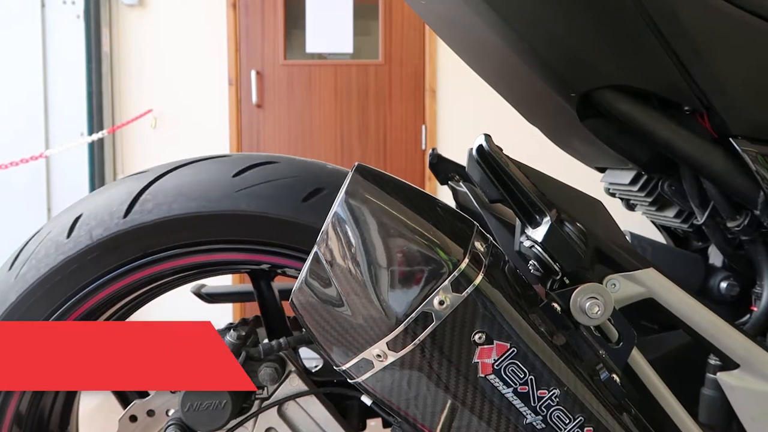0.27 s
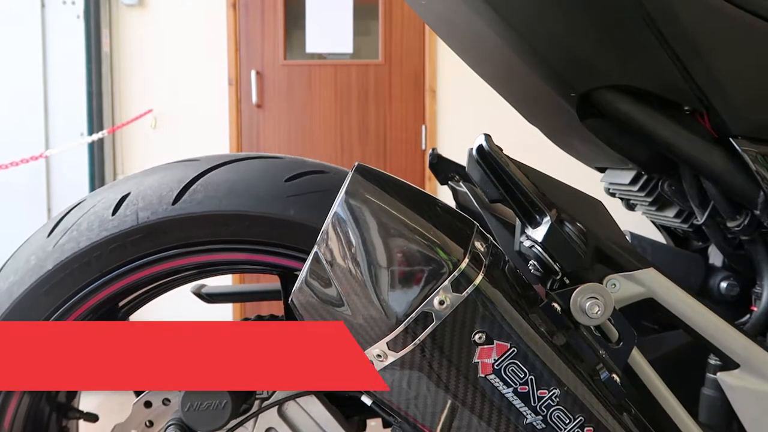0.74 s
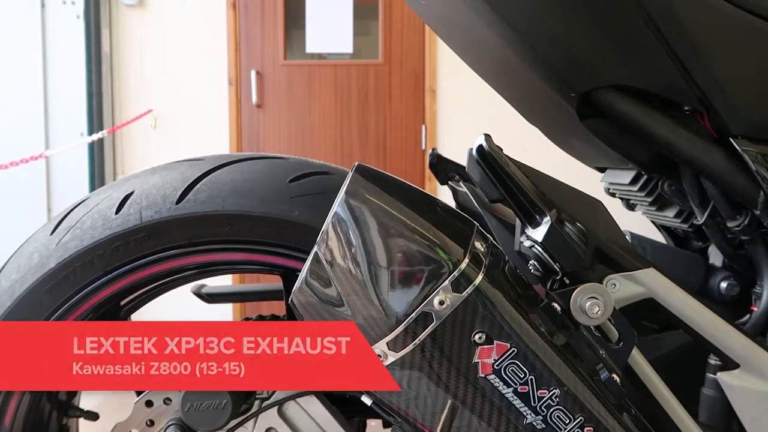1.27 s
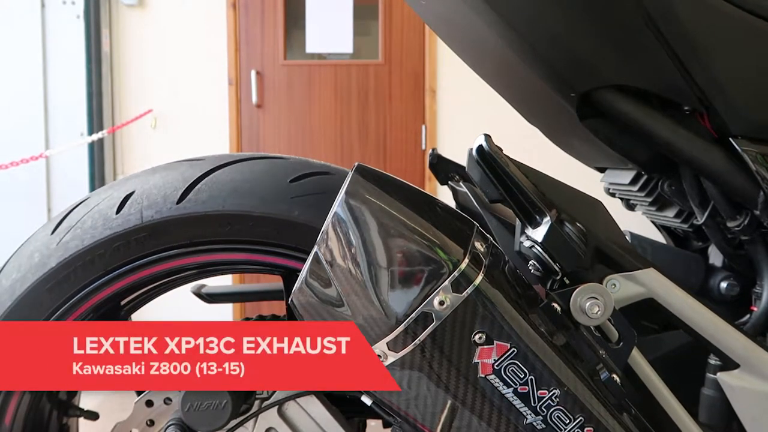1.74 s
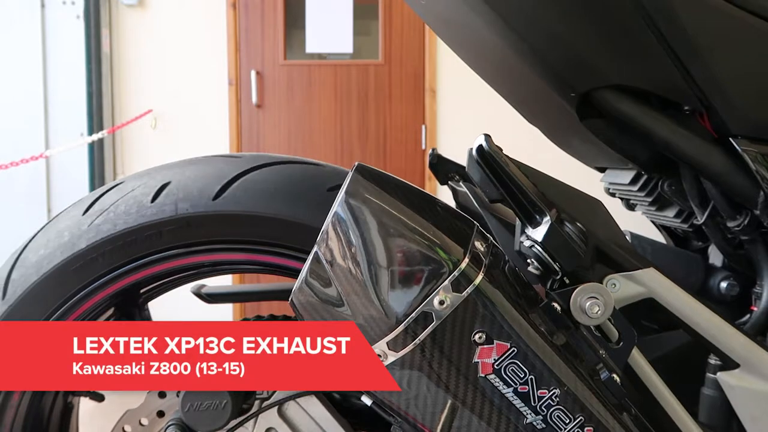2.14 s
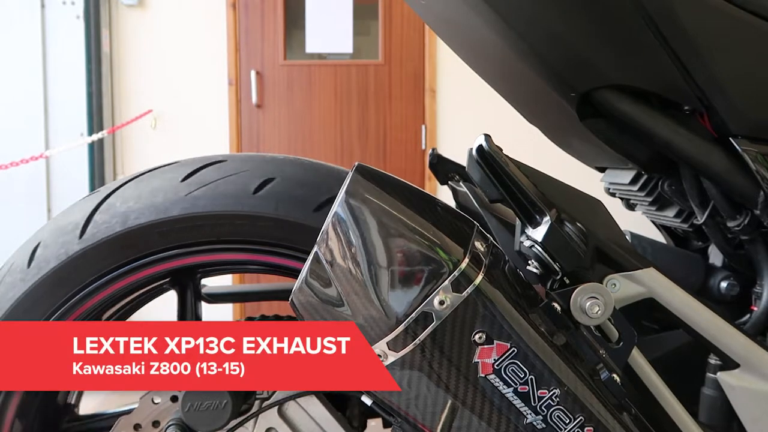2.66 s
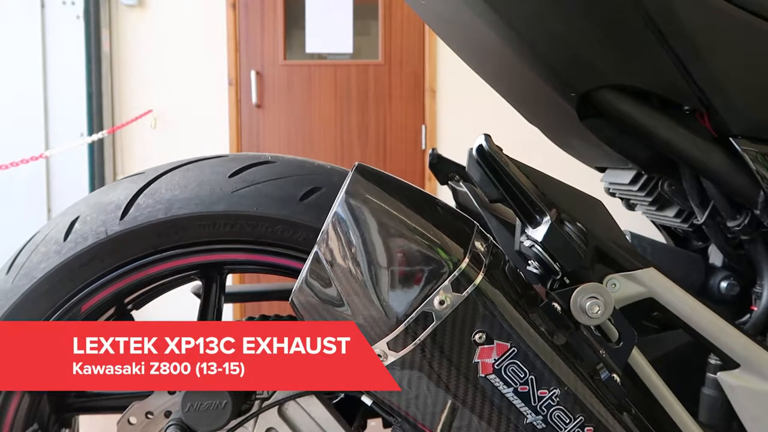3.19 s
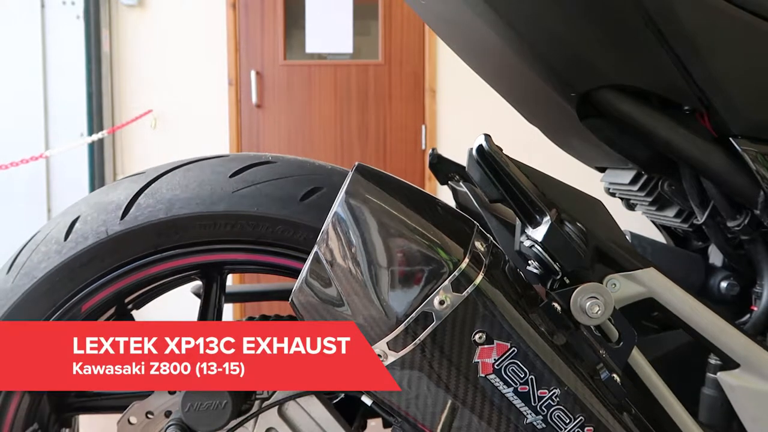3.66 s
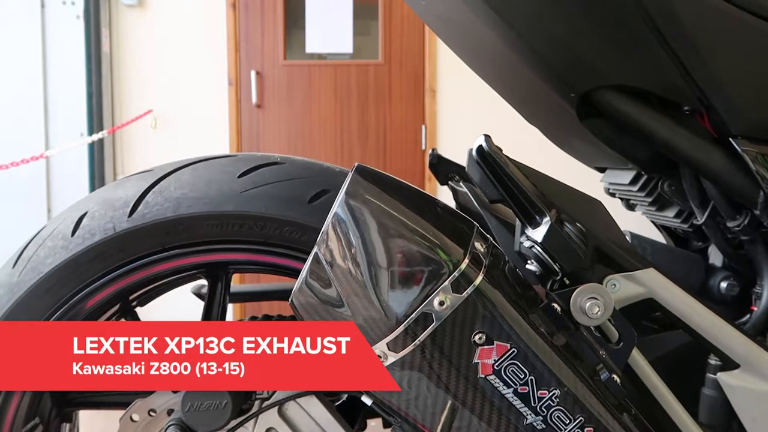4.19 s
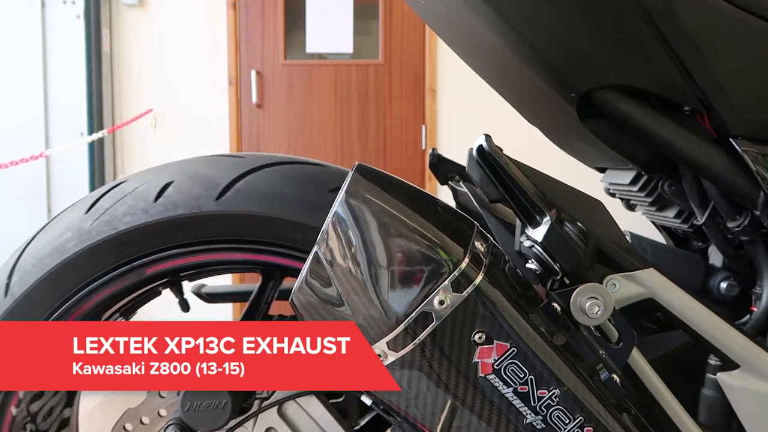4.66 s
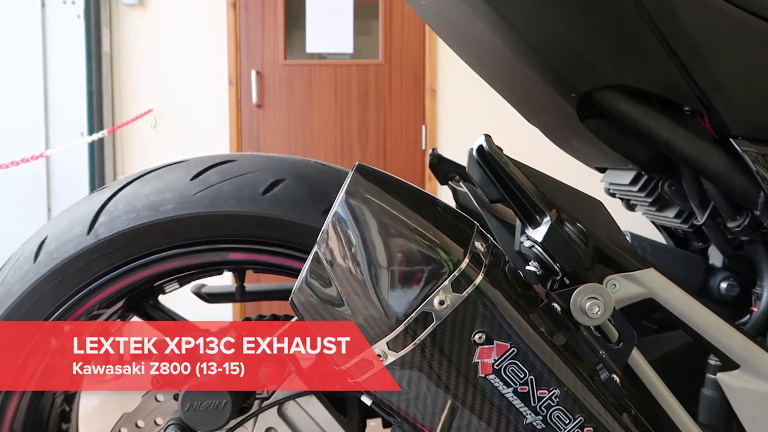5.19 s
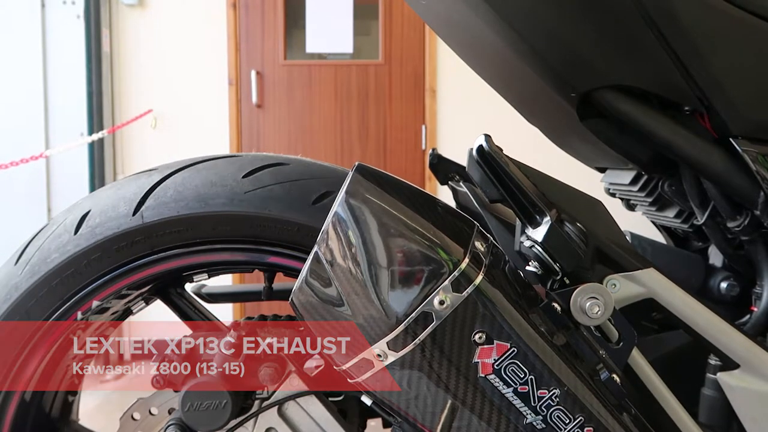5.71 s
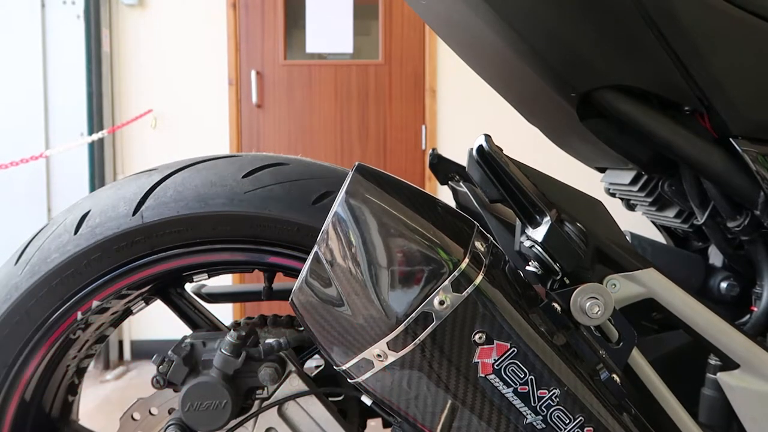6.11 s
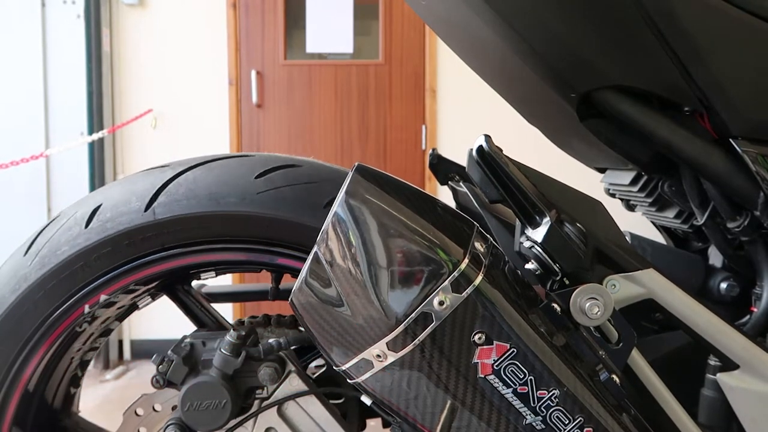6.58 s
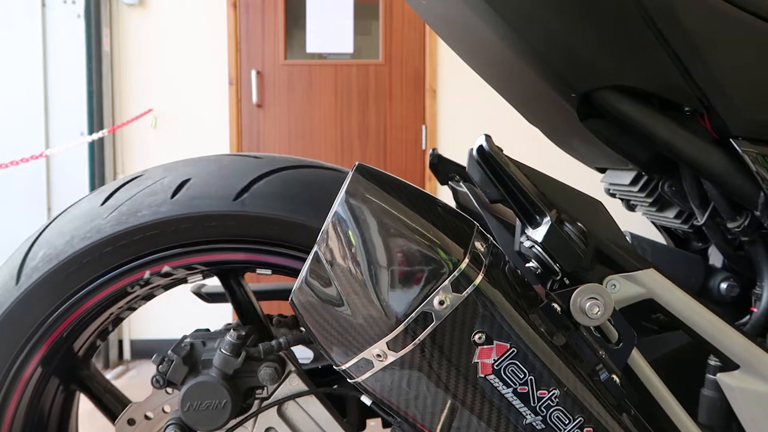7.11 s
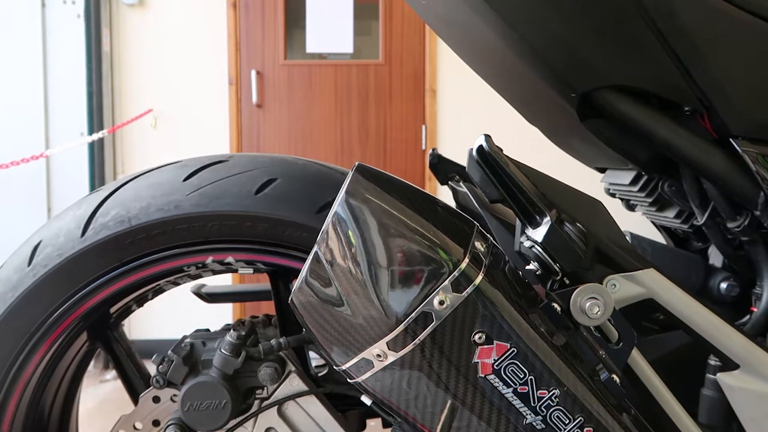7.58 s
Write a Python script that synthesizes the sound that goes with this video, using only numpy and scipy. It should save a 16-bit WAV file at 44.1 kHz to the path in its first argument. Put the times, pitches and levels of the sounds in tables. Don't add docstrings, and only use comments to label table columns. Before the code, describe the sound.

A motorcycle engine is revved indoors, miked near its silencer in stereo. It begins on a falling hum and soft, uneven idle puffs. Three short throttle stabs follow, the last strongest: crackling firing pulses, a fast rising snarl with hissing gas, a low gulp as the throttle shuts, then a clean descending drone with bright mechanical whirr and lumpy idle. Hard walls add a short ring.

```python
import sys
import numpy as np
from scipy import signal
from scipy.fft import rfft, irfft
from scipy.io import wavfile

SR = 44100
rng = np.random.default_rng(int(sys.argv[2]) if len(sys.argv) > 2 else 0)


def bounce(signal):
    frames = np.transpose(np.atleast_2d(signal))
    limited = np.clip(frames, -1, 1)
    pcm = np.round(limited * 32767).astype(np.int16)
    wavfile.write(sys.argv[1], SR, pcm)


def natural_amplitude(level_db):
    exponent = np.asarray(level_db, float) / 20
    return 10 ** exponent


N = 346185

# (throttle opens [s], top speed [s], fuel returns [s], coast length [share], level [dB])
BLIPS = [
    (-0.9, -0.55, 0.51, 1.01, -14),
    (1.69, 2.03, 2.91, 0.97, -1),
    (3.925, 4.31, 5.395, 1.01, 0.1),
    (6.295, 6.67, 7.71, 0.99, 1.1),
]
# (time [s], peak level [dB])
BARKS = [(0.59, -35), (0.646, -32), (0.706, -30), (0.827, -30), (0.872, -35), (0.94, -30), (1.099, -32),
         (1.144, -34), (1.204, -32), (1.298, -32), (1.343, -30), (1.386, -29), (1.456, -32), (1.526, -28),
         (1.571, -26), (1.643, -30), (1.69, -26), (3.038, -17), (3.092, -16), (3.134, -20), (3.195, -18),
         (3.257, -21), (3.332, -24), (3.385, -16), (3.423, -17), (3.528, -20), (3.573, -18), (3.629, -18),
         (3.717, -19), (3.761, -14), (3.801, -16), (3.889, -15), (3.932, -14), (3.691, -27), (5.481, -14),
         (5.525, -25), (5.559, -25), (5.644, -23), (5.731, -24), (5.962, -29), (6.175, -27), (6.199, -28),
         (5.54, -16), (5.576, -13), (5.611, -15), (5.691, -18), (5.766, -17), (5.836, -22), (5.869, -19),
         (5.906, -14), (5.946, -22), (6.028, -17), (6.069, -17), (6.109, -18), (6.222, -18), (6.268, -14),
         (6.29, -15)]
# (frequency [Hz], width [Hz], gain [dB])
CAN = [(1350, 100, 5), (1580, 130, 6), (1825, 60, 4), (2300, 200, 2), (2930, 260, 10), (4100, 400, 4)]


def rms_one(x):
    return x / np.sqrt(np.mean(x ** 2) + 1e-20)


def cut(x, kind, hz, order=2):
    return signal.sosfilt(signal.butter(order, hz, kind, fs=SR, output="sos"), x)


def resonate(x, peaks):
    hz, width, db = np.transpose(peaks)
    a = natural_amplitude(db / 2)
    half = np.pi * width / SR
    c = -2 * np.cos(2 * np.pi * hz / SR)
    sos = np.transpose([1 + half * a, c, 1 - half * a, 1 + half / a, c, 1 - half / a])
    return signal.sosfilt(np.ascontiguousarray(sos / sos[:, 3:4]), x)


def shape(x, spectrum):
    hz, db = np.transpose(spectrum)
    grid = np.log(np.arange(1, N // 2 + 2) * SR / N)
    return rfft(x) * natural_amplitude(np.interp(grid, np.log(hz), db))


def coloured(spectrum):
    return rms_one(irfft(shape(rng.standard_normal(N), spectrum), N))


def drift(hz, count):
    steps = np.arange(0, N + SR / hz, SR / hz / 2)
    return [np.interp(np.arange(N), steps, row) for row in 1.4 * rng.standard_normal((count, len(steps)))]


def along(rows, x):
    first, *columns = np.transpose(rows)
    return [np.interp(x, first, c) for c in columns]


def ramp(t, length_s):
    return np.clip(t / max(length_s, .005), 0, 1)


def throttle():
    climbing = [(0, 0), (.08, .04), (.235, .175), (.36, .29), (.53, .51), (.66, .68), (.77, .82),
                (.88, .925), (1, 1)]
    # (time from the fuel's return [s], firing rate [Hz])
    coasting = [(-1.1, 368), (-.75, 274), (-.545, 218), (-.255, 151), (0, 104), (.25, 75), (.51, 53),
                (.8, 44.5), (1.5, 43)]
    opening_s, shutting_s, relight_s = .03, .08, .07
    relight_fade_s, level_s = .25, .09
    choke_hz, choke_span_hz = 268, 75
    t = np.arange(N) / SR
    state = np.zeros((7, N))
    for opens, top, back, share, level_db in BLIPS:
        climb = (t - opens) / (top - opens)
        gained, = along(climbing, climb)
        coast, = along(coasting, (t - back) / share)
        peak, = along(coasting, (top - back) / share)
        rate = np.where(t < top, state[0] + gained * (peak - state[0]), coast)
        shut = ramp(t - top, shutting_s)
        cut_off = shut - ramp(t - back, relight_s)
        opened = ramp(t - opens, opening_s) - shut
        choke = ramp(rate - choke_hz, choke_span_hz)
        relight = (t > back) * np.exp(-np.maximum(t - back, 0) / relight_fade_s)
        level = state[6] + ramp(t - opens, level_s) * (level_db - state[6])
        state = np.where(t < opens, state, [rate, climb, opened, cut_off, choke, relight, level])
    return state


def idle_strength(relight, level_db):
    idle_db, relight_db, lump_db, lump_hz = -36, 11, 2.2, 9
    surge_loss_db, surge_fall_db_per_s = 8, 170
    t = np.arange(0, N, 64) / SR
    surges = [db - surge_loss_db - surge_fall_db_per_s * np.abs(t - s) for s, db in BARKS]
    surges = np.interp(np.arange(N) / SR, t, np.max(surges, axis=0))
    wandering = lump_db * drift(lump_hz, count=1)[0]
    return np.maximum(idle_db + level_db + relight_db * relight + wandering, surges)


def controls():
    # (climb time [share], firing level [dB], gas hiss level [dB], load [0-1])
    effort = [(0.0, -21, -55, .1), (.11, -8.5, -50, .24), (.3, -15, -43, .44), (.45, -16, -35, .66),
              (.58, -14.5, -27, .76), (.85, -17.5, -26.5, .86), (1.0, -16.5, -32, .7), (1.2, -13, -40, .3)]
    rate, climb, opened, cut_off, choke, relight, level_db = throttle()
    open_db, open_hiss_db, open_load = along(effort, climb)
    octaves = np.log2(rate / 200)
    idling = 1 - opened - cut_off
    hum_db = -20.5 + 7.5 * octaves - 9 * idling - 8 * choke * cut_off
    hum_db = level_db + np.maximum(hum_db, -38) - 26 * opened * (1 - .45 * climb)
    shut_hiss_db = np.maximum(-42.5 + 15 * octaves - 13 * choke, -58.5)
    gust_db, gust_hz = 1.8, 8
    hiss_db = level_db + opened * open_hiss_db + (1 - opened) * shut_hiss_db
    hiss_db = hiss_db + gust_db * drift(gust_hz, count=1)[0]
    ragged_db = hum_db - 12.5
    firing_db = opened * (open_db + level_db) + idling * idle_strength(relight, level_db) + cut_off * ragged_db
    load = opened * open_load + cut_off * .4 + idling * .04
    uneven_db = opened * .5 + cut_off * 5 + idling * 3.5
    return rate, firing_db, hum_db, hiss_db, load, uneven_db, level_db


def opening_pulse(mid):
    mid[:170] += .3 * np.sin(np.linspace(.6, 6.6, 170)) * np.linspace(.9, 1.2, 170)


def pumping(turns, rate, hum_db):
    # (multiple of the firing rate [1], level [dB])
    hum_orders = [(.5, -25), (1, -0.2), (1.5, -12.5), (2, -5), (2.5, -15.5), (3, -17.5), (3.5, -21.5),
                  (4, -23), (4.5, -26), (5, -27), (5.5, -29), (6, -31), (6.5, -30.5), (7, -40.5),
                  (7.5, -38.5), (8, -38), (9, -49.5), (10, -50)]
    wobble_rad = .16
    waver = drift(8.5, count=len(hum_orders))
    wander = drift(22, count=len(hum_orders))
    slow = np.log2(200 / np.clip(rate, 80, 400))
    orders = np.zeros(N)
    for (k, db), w, p in zip(hum_orders, waver, wander):
        level_db = db + 0.85 * min(k, 5) * w + 2.8 * slow * np.log2(k)
        orders += natural_amplitude(level_db) * np.cos(2 * np.pi * k * turns + wobble_rad * k * p)
    return natural_amplitude(hum_db) * resonate(cut(orders, "high", 115), CAN)


def shell(turns, hum_db):
    multiples = np.arange(8.5, 12.6, .5)
    fade_db = -2.5 * np.abs(multiples - 10.2)
    flutter = drift(90, count=len(multiples))
    orders = sum(natural_amplitude(db) * w * np.cos(2 * np.pi * k * turns) for k, db, w in zip(multiples, fade_db, flutter))
    return natural_amplitude(hum_db - 24.5) * cut(orders, "band", [2800, 3000], order=1)


def gas_hiss(turns, hiss_db, spectrum, gate):
    swelling = 1 + gate * np.cos(2 * np.pi * turns)
    return natural_amplitude(hiss_db) * swelling * rms_one(resonate(coloured(spectrum), CAN))


def clatter():
    # (frequency [Hz], level [dB per Hz])
    clatter_spectrum = [(500, -30), (800, 0), (1050, 0), (1250, -9), (1700, -10), (2400, -16), (4000, -19),
                        (6500, -30), (8000, -70)]
    return coloured(clatter_spectrum)


def valve_gear():
    # (frequency [Hz], level [dB per Hz])
    whirr_spectrum = [(2500, -29), (5000, 10), (7000, 0), (9000, -6), (11000, -17.5), (13000, -16),
                      (15500, -29.5), (18000, -70)]
    return coloured(whirr_spectrum)


def low_rumble(rate, level_db):
    noise = cut(rng.standard_normal((2, N)), "band", [25, 110])
    return natural_amplitude(level_db + 24) * (45 / rate) ** 2.5 * noise


def firings(rate, turns, level_db, uneven_db):
    # (time [s], peak level [dB])
    kicks = [(1.71, -18), (1.726, -12), (1.752, -6), (1.7735, -3.5), (1.792, -4), (3.951, -5),
             (3.9675, -.5), (3.982, 0), (4.0065, -.5), (4.0275, -4), (4.046, -3.5), (6.31, -9),
             (6.3275, -2), (6.3425, 1), (6.367, 0), (6.388, -4), (6.397, -2)]
    kick_loss_db = 4.5
    marked = np.array(sorted(BARKS + [(s, db - kick_loss_db) for s, db in kicks]))
    at = ((marked[:, 0] + .0032) * SR).astype(int)
    whole = np.cumsum(np.maximum(np.round(np.diff(turns[at], prepend=0)), 1))
    crank = turns + np.interp(np.arange(N), at, whole - turns[at])
    fired = np.diff(np.floor(crank + 1e-6), prepend=0) > 0
    fired[at - 1], fired[at + 1], fired[at] = False, False, True
    cylinder_db = uneven_db * np.array([.6, -.6, 0.14, -.3])[np.floor(crank).astype(int) % 4]
    scatter_db = uneven_db * rng.standard_normal(N)
    strength_db = level_db + cylinder_db + scatter_db - 10 * np.log10(rate / 50)
    strength_db[at] = marked[:, 1] - 6.5
    return fired * natural_amplitude(strength_db) + 1e-18


def bell_pulses(clicks, width_s):
    bell = np.exp(-.5 * (np.arange(-120, 121) / SR / width_s) ** 2)
    return np.convolve(clicks, bell / bell.sum(), "same")


def exhaust(clicks, load, rate):
    load = np.clip(load, 0, 1)
    puff_s, hard_s = .00062, .00026
    ragged = clicks * natural_amplitude(2.5 * rng.standard_normal(N))
    puff = natural_amplitude(49) * cut(bell_pulses((1 - load) * clicks, puff_s), "high", 160, order=1)
    hard = natural_amplitude(46.5) * cut(bell_pulses(load * clicks, hard_s), "band", [320, 800], order=1)
    front = cut(cut(load ** 5 * ragged, "band", [850, 1750]), "low", 2300)
    rasp = natural_amplitude(41) * resonate(front, CAN)
    slow = clicks * (1 - load) ** 3 * (50 / rate) ** 2
    thump = natural_amplitude(36) * cut(slow, "band", [95, 170])
    return rasp + puff + hard + thump


def room(x):
    t60_s, wall_cut_hz = 0.47, 3200
    out = np.zeros(N)
    dull = np.exp(-2 * np.pi * wall_cut_hz / SR)
    lags = (rng.uniform(.015, .045, size=10) * SR).astype(int)
    for k, lag in enumerate(lags):
        loop, state = x.copy(), [0.]
        gain = natural_amplitude(-60 * lag / SR / t60_s)
        for i in range(lag, N, lag):
            back, state = signal.lfilter([gain * (1 - dull)], [1, -dull], loop[i - lag:i], zi=state)
            loop[i:i + lag] += back[:N - i]
        out += (loop - x) * (-1) ** k
    return out


def leak(x):
    # (frequency [Hz], gain [dB])
    side_share = [(250, -40), (600, -23), (850, -12), (1200, -6), (1700, -4), (2400, -3), (3400, -8),
                  (5000, -30)]
    lag_rad = .55
    return irfft(shape(x, side_share) * np.exp(-1j * lag_rad), N)


def slam():
    slam_db, slam_s = -26, .035
    t = np.arange(N) / SR
    gulps = sum(natural_amplitude(slam_db + db) * np.exp(-.5 * ((t - top - .015) / slam_s) ** 2) for _, top, _, _, db in BLIPS)
    return gulps * rms_one(cut(rng.standard_normal(N), "band", [75, 230]))


def pops():
    # (time [s], peak level [dB])
    late_pops = [
        (5.577, -27),
    ]
    t = np.arange(900) / SR
    out = np.zeros(N + SR)
    for s, db in late_pops:
        start = int(s * SR)
        out[start:start + 900] += natural_amplitude(db + 4) * rng.standard_normal(900) * np.exp(-t / .004)
    return cut(cut(out[:N] + 1e-18, "band", [450, 3500]), "low", 1200, order=1)


def scene():
    # (frequency [Hz], width [Hz], gain [dB])
    standing = [(75, 50, -12), (130.4, 21.6, 7), (144, 4.5, -4), (173, 36, -2), (205, 73, 10.8),
                (219.2, 6.7, 3), (235, 66, -9), (265.5, 21, 10), (313.8, 27, 8.5), (339.3, 25, 3.5),
                (357.5, 4, -16), (371.2, 10.2, 9), (400.3, 18, -13), (410.8, 41.7, 15.5), (483.7, 15.8, 11),
                (522, 22, -2), (518, 13, 3), (585.8, 65, 7.5), (661.4, 11, -21), (677, 90, 2.5),
                (756, 128, 9.5), (792, 8.3, -4.5), (817, 11, 4.5), (868, 45, -3), (935, 40, 1),
                (1036, 120, 10), (1191, 162, -14)]
    # (frequency [Hz], level [dB])
    hiss_mid = [(600, -22), (800, -3), (1100, 5), (1360, 2), (1600, -3), (2080, -13), (2930, -8.5),
                (3970, -12), (7060, -22), (9180, -55), (15500, -120)]
    hiss_side = [(500, -37), (900, -17), (1200, -8), (1850, -8), (2400, -2.5), (3150, -10), (4300, -3.5),
                 (4800, -10), (6800, -21.5), (8500, -27), (11000, -37), (15500, -46)]
    rate, firing_db, hum_db, hiss_db, load, uneven_db, level_db = controls()
    turns = np.cumsum(rate) / SR
    pulses = exhaust(firings(rate, turns, firing_db, uneven_db), load, rate)
    hum = pumping(turns, rate, hum_db)
    walls = room((1 - .6 * load) * pulses + .5 * hum)
    pipe = pulses + natural_amplitude(-12) * walls + hum + shell(turns, hum_db)
    hiss = cut(gas_hiss(turns, hiss_db + 1.2, hiss_mid, gate=0.1), "low", 7220, order=10)
    rumble = low_rumble(rate, level_db)
    mid = resonate(pipe + hiss + pops(), standing)
    mid = mid + natural_amplitude(level_db - 58) * clatter() + natural_amplitude(-48) * rumble[0] + slam()
    opening_pulse(mid)
    reflected = natural_amplitude(-17) * cut(resonate(walls + natural_amplitude(2) * hum, CAN), "high", 980, order=3)
    scattered = cut(reflected, "low", 7400, order=6) + gas_hiss(turns, hiss_db + .8, hiss_side, gate=0.63)
    whirr = natural_amplitude(hum_db - 31)
    side = leak(mid) + natural_amplitude(-59) * rumble[1] + scattered + (whirr + natural_amplitude(hiss_db - 38)) * valve_gear()
    unloaded = 1 - np.clip(5 * (load - .42), 0, 1)
    mid = mid + natural_amplitude(-7.5) * whirr * unloaded * valve_gear()
    return np.array([mid + side, mid - side])


def low_pass(x):
    return signal.sosfilt(signal.butter(12, 15700, fs=SR, output="sos"), x)


def record(dry):
    thin = cut(dry, "high", 40)
    splatter = cut(np.clip(thin, -.97, .97) - thin, "band", [90, 4500])
    loud = np.clip(thin + splatter, -1.04, 1.04)
    return low_pass(loud)


dry = scene()
out = record(dry)
bounce(out)
```